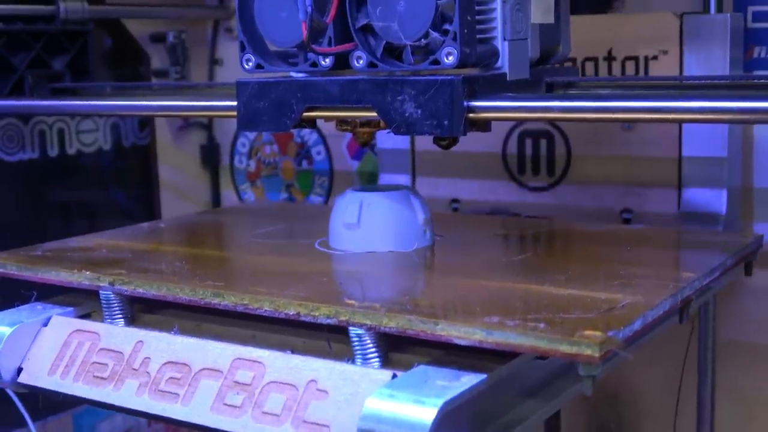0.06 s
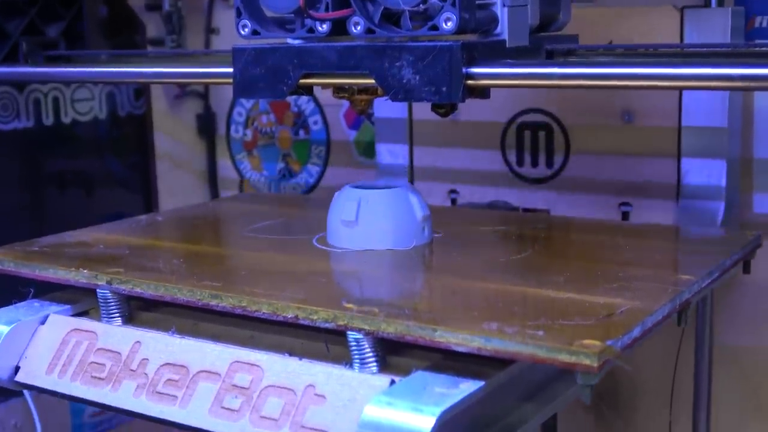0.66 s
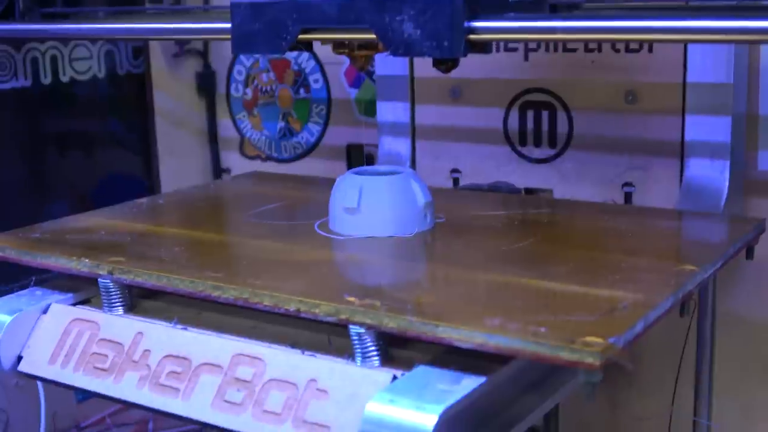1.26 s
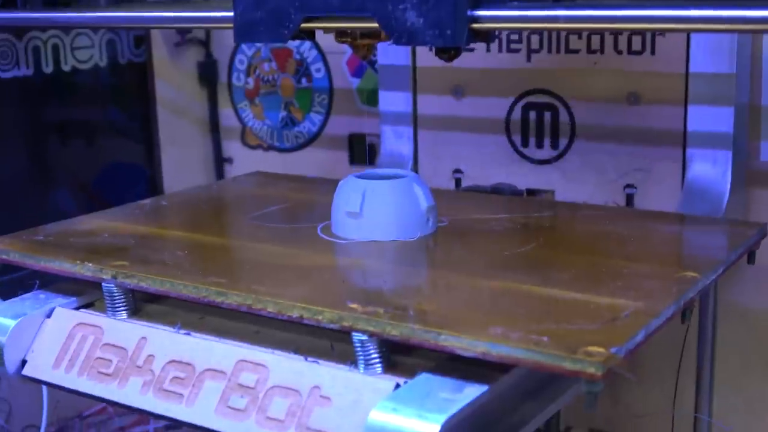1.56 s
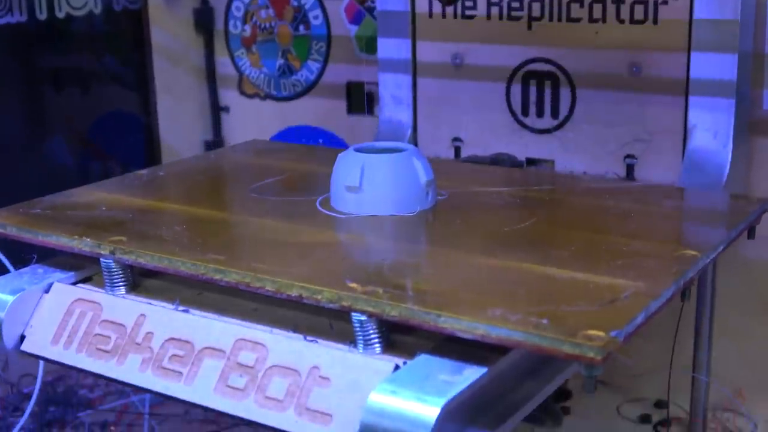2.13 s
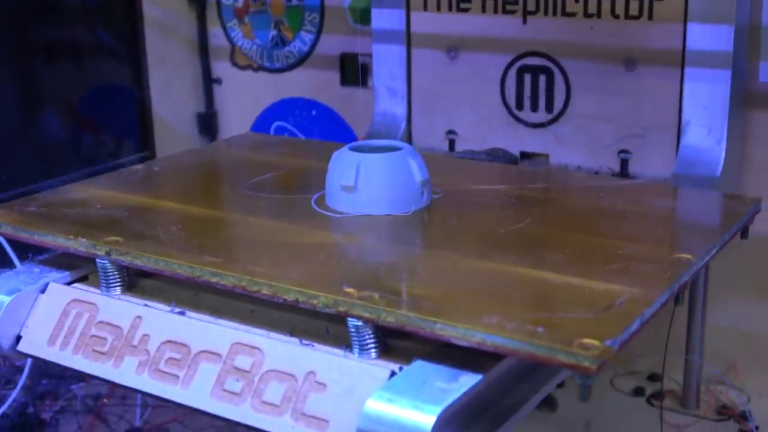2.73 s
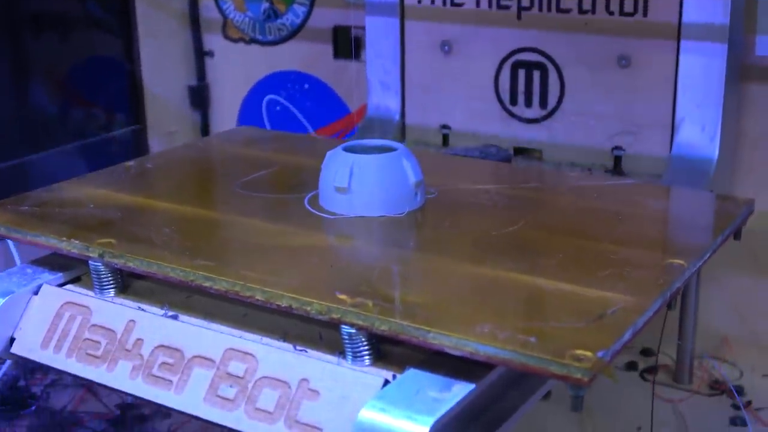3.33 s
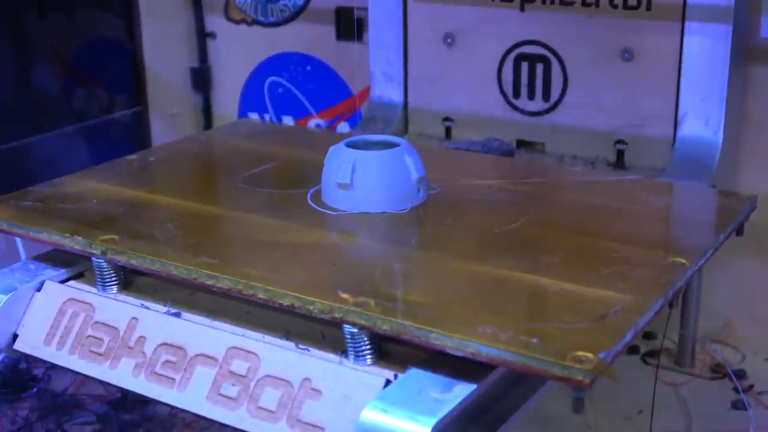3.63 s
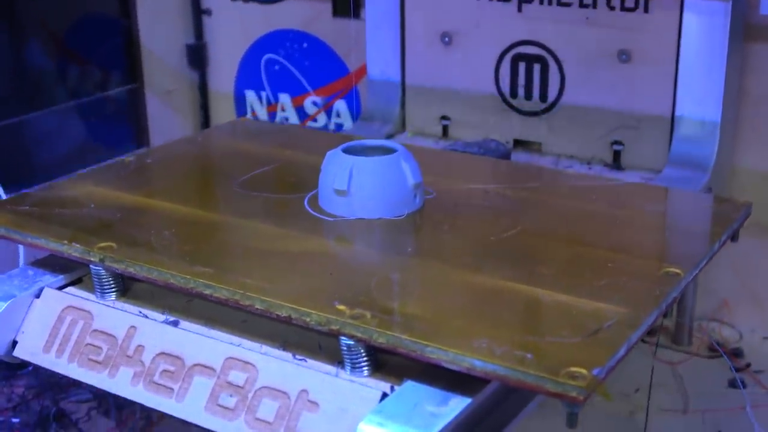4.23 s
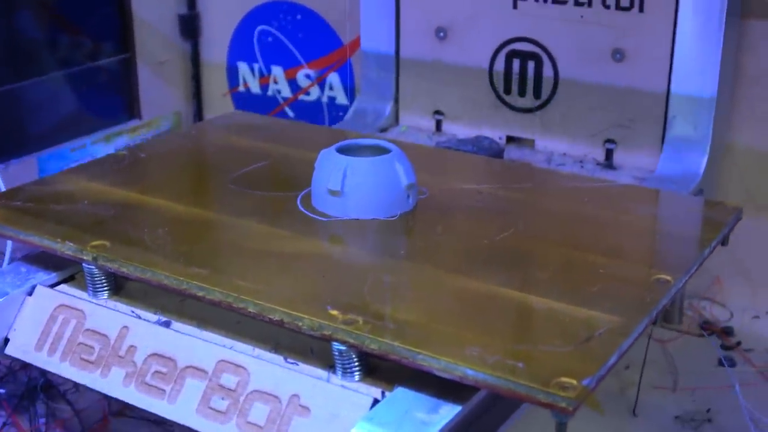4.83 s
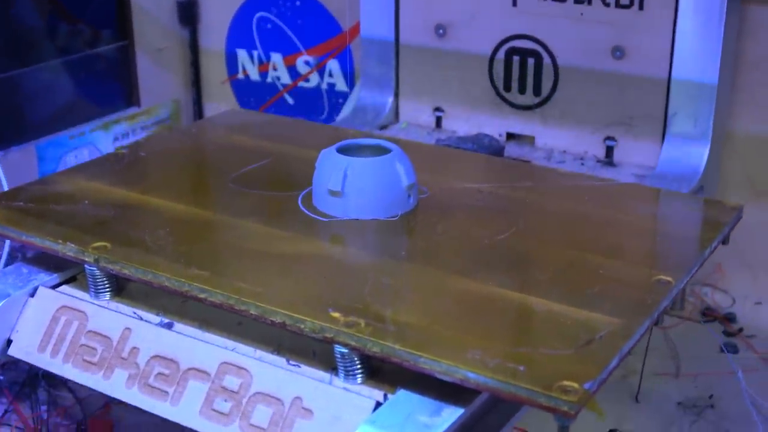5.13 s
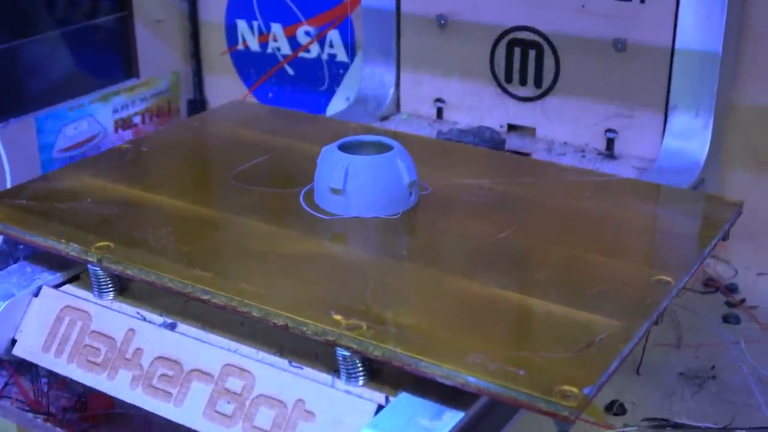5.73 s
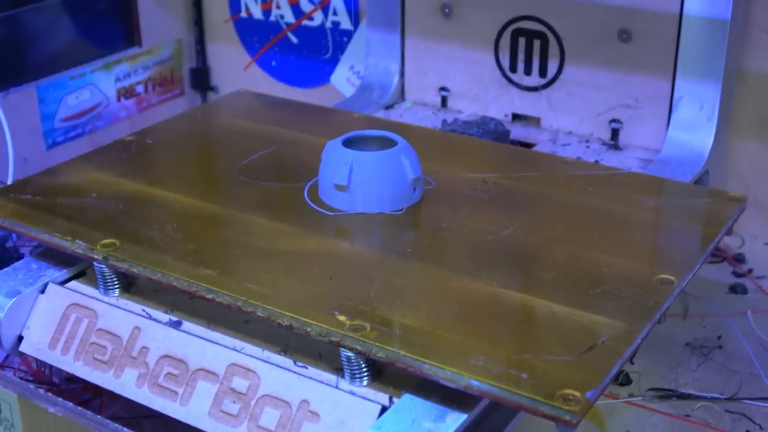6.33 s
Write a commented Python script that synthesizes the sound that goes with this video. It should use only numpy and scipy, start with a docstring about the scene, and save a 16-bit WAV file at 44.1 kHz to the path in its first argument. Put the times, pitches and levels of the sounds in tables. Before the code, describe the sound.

A small 3D printer is already running at the start, heard close up in a workshop, and continues without a break for a little over six seconds. The main sound is a mid-pitched motor whine that holds one pitch and throbs evenly about eight times a second, its overtones slowly swelling and fading. Underneath, small fans give a low hum, joined by a thin high buzz and a soft rush of air and bearings that grows slightly louder, then levels off. A light ringing from the carriage colours the first two seconds. At about 1.8 seconds there is a brief soft sizzle, and a faint high fluttering tone steps forward and stays. More gentle sizzling drifts in and out from around 3 seconds onward. Between about 5.6 and 6 seconds a second motor whirs faintly, gliding down and up in pitch, while the main whine carries on to the end.

```python
"""A steady, throbbing motor whine, close up: a 3D printer running at one speed in a workshop.
The stepper sings at its step rate and throbs once a shaft turn; its overtones swell and fade
as the microphone glides through their standing waves. Under it three small fans hum, air and
bearings rush through the frame and the motor coils add a thin buzz. The carriage wakes
sizzling resonances, and near the end a second axis whirs faintly."""
import sys
import numpy as np
from scipy import signal
from scipy.fft import rfft, irfft
from scipy.io import wavfile

SR = 44100
rng = np.random.default_rng(int(sys.argv[2]) if len(sys.argv) > 2 else 0)


def dump(signal):
    """Clip the signal to [-1, 1] and save it as 16-bit WAV at the path in sys.argv[1]."""
    limited = np.clip(np.atleast_2d(signal).T, -1, 1)
    pcm = np.round(limited * 32767).astype(np.int16)
    wavfile.write(sys.argv[1], SR, pcm)


N = 281358
TIME, BIN_HZ = np.arange(N) / SR, np.fft.rfftfreq(N, 1 / SR)
STEP_HZ, STEPS_PER_TURN = 416.0, 50
SHAFT_HZ = STEP_HZ / STEPS_PER_TURN
SHAFT_ANGLE = 2 * np.pi * SHAFT_HZ * (TIME - 0.0062)  # zero at a peak of the throb


# The lead whine, each partial riding its own standing wave:
# step_multiple, level_db, drift_db_per_s, roughness, swing_db, antinode_s, period_s
WHINE_PARTIALS = [(1, -24.5, 0, .03, 1.5, 4.47, 10), (3, -45, 0.57, 0.13, 2.5, 3.66, 5.4),
                  (4, -53, 0.5, 0.07, 6.5, 2.52, 5.5), (5, -46.5, -2.5, 0.22, 5.8, 3.97, 11),
                  (7, -67.5, 0, 0, 8, 1.8, 2.54), (9, -68, 1, 0.3, 4, 4.46, 6),
                  (15, -80, 0.5, .4, 9, 3.9, 4), (16, -72, 0, .45, 2, 5.47, 4.6)]
# Level envelopes of three overtones that come and go unevenly: time_s, level_db (before lift_db)
SECOND_ENVELOPE = [(0.1, -39), (0.6, -36), (1.64, -42), (1.98, -50), (4.28, -47), (6.07, -40), (6.13, -36),
                   (6.3, -43)]
SIXTH_ENVELOPE = [(0.1, -54), (0.43, -64), (1.26, -53), (2.33, -60), (2.85, -53), (3.91, -43.5),
                  (4.55, -50), (5.99, -50), (6.3, -52)]
EIGHTH_ENVELOPE = [(0.1, -52), (1.2, -61), (1.48, -51), (2.81, -60.5), (4.81, -67), (4.97, -57), (5.4, -68),
                   (5.71, -60), (6.3, -58)]

def stepper_whine():
    """Clocked steps give sharp overtones that swell and fade as the microphone moves."""
    steps, out = STEP_HZ * TIME, np.zeros(N)
    for multiple, db, drift_db_per_s, roughness, swing_db, antinode_s, period_s in WHINE_PARTIALS:
        ripple_db = 0.5 * wander(2.7) * (multiple > 1)
        level_db = db + drift_db_per_s * TIME + standing_wave(swing_db, antinode_s, period_s)
        out += tone(multiple * steps + rng.random(), level_db + ripple_db, roughness, flutter_hz=6.5)
    lift_db = 1.6
    for multiple, envelope in ((2, SECOND_ENVELOPE), (6, SIXTH_ENVELOPE), (8, EIGHTH_ENVELOPE)):
        level_db = lift_db + np.interp(TIME, *np.transpose(envelope))
        out += tone(multiple * steps + rng.random(), level_db, roughness=0.06, flutter_hz=8.9)
    return out


# The throb, with sidebands set relative to each tone:
# step_multiple, level_db, upper_sideband_db, lower_sideband_db, wobble_db, singing_gain_db
THROB_TONES = [(.5, -29.5, -2, -11, 0.33, -0.3), (1.5, -56, 0, -9, 3, -1), (2.5, -65, 9, 5, 1.5, -1.5),
               (5.5, -61.5, 0, -8, 1.4, 7)]

def rotor_throb():
    """The slightly off-centre rotor swells and bends the half-step tones once a turn."""
    turn, out = np.exp(1j * SHAFT_ANGLE), np.zeros(N)
    singing = np.clip((TIME - 1.83) / 0.069, 0, 1)  # the highest tone steps forward
    for multiple, db, upper_db, lower_db, wobble_db, singing_gain_db in THROB_TONES:
        carrier = np.exp(2j * np.pi * (multiple * STEP_HZ * TIME + rng.random()))
        beat = 1 + amp(upper_db) * turn + amp(lower_db) / turn
        level_db = db + singing_gain_db * singing + wobble_db * wander(1.3)
        out += np.sqrt(2) * amp(level_db) * (carrier * beat).real
    return out


# Low body under the whine: shaft_multiple, level_db, roughness
DRIVE_TONES = [(11.9, -68.5, 0.2), (38, -38.5, 0.1), (37.5, -49, 0.47), (62.44, -54.5, 0.35),
               (64.5, -64, .3), (27, -52, 0.34), (29.8, -54, 0.7), (32.56, -51, 0.37), (35.2, -57.5, 0)]

def drive_hum():
    """Motor, pulley and belt hum at higher multiples of the shaft rate."""
    turns = SHAFT_HZ * TIME
    return sum(tone(multiple * turns + rng.random(), db, roughness, flutter_hz=18)
               for multiple, db, roughness in DRIVE_TONES)


# One fan a row: pitch_hz, level_db (before trim_db), then its overtones relative to that level:
# second_db, third_db, fourth_db, fifth_db
FAN_VOICES = [(125.93, -38.5, -14, -18, -16, -36), (132.93, -48, -23, 3, -28, -11.5),
              (123.1, -60.5, -12, 9, 11.5, 10)]

def fan_hum(trim_db=-0.8):
    """Five-bladed fans at nearly equal speeds drift a little and beat with each other."""
    out = np.zeros(N)
    for pitch_hz, db, *overtones_db in FAN_VOICES:
        turns = np.cumsum(pitch_hz * (1 + 0.00069 * wander(1))) / SR
        for k, relative_db in enumerate([0] + overtones_db, 1):
            out += amp(db + relative_db) * np.sqrt(2) * np.cos(2 * np.pi * (k * turns + rng.random()))
    return out * amp(trim_db + standing_wave(swing_db=1.64, antinode_s=4.73, period_s=7.6))


# Base EQ curve of the rush: frequency_hz, density_db
RUSH_EQ = [(25, -104), (60, -89), (110, -77), (145, -79), (180, -72.5), (230, -70), (340, -72), (600, -68),
           (1150, -73), (2600, -77.5), (4800, -83.5), (6600, -85.5), (9000, -97.5), (12600, -96.5),
           (15700, -110)]
# Resonances of frame and bed, as bell boosts on that curve: centre_hz, width_hz, boost_db
FRAME_RESONANCES = [(219, 18, 7), (263, 23, 5.5), (395.5, 39, 8), (457, 68, 7), (940, 26, 3.5),
                    (1035, 39, 3.5), (1416, 195, 10.5), (1743, 90, 4), (2035, 71, 3.5), (2294, 23, 9),
                    (3890, 460, 4), (4550, 66, 0.5), (5260, 320, 4), (8300, 570, 3), (11840, 720, 0.5)]

def air_and_bearing_rush(swell_db):
    """Noise through the frame: lows pulse with the shaft, sizzle with the steps, under smooth hiss."""
    colour_db = eq_curve(RUSH_EQ)
    for centre_hz, width_hz, boost_db in FRAME_RESONANCES:
        colour_db += boost_db * 2 ** -(2 * (BIN_HZ - centre_hz) / width_hz) ** 2
    spectrum = rfft(rng.standard_normal(N)) * amp(colour_db) * np.sqrt(SR / 2)
    below_sizzle = 1 / (1 + (BIN_HZ / 1150) ** 6)
    below_hiss = 1 / (1 + (BIN_HZ / 7000) ** 12)
    bands = below_sizzle, below_hiss - below_sizzle, 1 - below_hiss
    low, sizzle, hiss = (irfft(spectrum * band, N) for band in bands)
    low *= (1 + 0.063 * np.cos(SHAFT_ANGLE)) * amp(0.15 * swell_db + 0.7 * wander(16))
    sizzle *= (1 + 0.081 * np.cos(2 * np.pi * STEP_HZ * TIME)) * amp(swell_db + 0.99 * wander(20))
    return low + sizzle + hiss * amp(swell_db)


# Patches of ringing, levels before flicker and pulsing:
# centre_hz, width_hz, level_db, peak_s, half_length_s, flicker_db, pulse_depth
CARRIAGE_RINGS = [(1454, 66, -50.5, 0.66, 1.6, -2, 1), (3450, 1300, -52, 1.85, 0.15, -3, 0),
                  (4000, 560, -56, 5.9, 0.51, 1, 0), (4554, 91, -54, 3.1, 1.7, 2, 0.1),
                  (5160, 200, -58, 5.1, 0.88, 5, 0), (5630, 600, -57.5, 4.2, 0.54, 4, 0)]

def carriage_rings(pulse_hz=8.9, pulse_peak_s=0.58):
    """Bearings on the rods excite sizzling resonances that fade in, flicker or pulse, and fade out."""
    out = np.zeros(N)
    pulse = np.cos(2 * np.pi * pulse_hz * (TIME - pulse_peak_s))
    for centre_hz, width_hz, db, peak_s, half_length_s, flicker_db, pulse_depth in CARRIAGE_RINGS:
        resonance = 1 / (1 + (2.3 * (BIN_HZ - centre_hz) / width_hz) ** 2)
        ring = irfft(rfft(rng.standard_normal(N)) * resonance, N)
        envelope = np.exp(-.5 * ((TIME - peak_s) / half_length_s) ** 2) * (1 + pulse_depth * pulse)
        out += ring / ring.std() * amp(db + flicker_db * wander(24)) * envelope
    return out


# Base contour of the buzz's comb lines: frequency_hz, level_db
BUZZ_EQ = [(6000, -78.5), (6500, -63), (7000, -94), (8300, -76), (9000, -76), (10200, -79.5), (10800, -87),
           (11700, -70.5), (12200, -80), (12700, -90), (13500, -87), (15700, -85)]

def coil_buzz(swell_db, blur_hz=9):
    """The coil current repeats every four steps: a bright comb of slightly blurred lines."""
    cycle_hz = STEP_HZ / 4
    line = np.round(BIN_HZ / cycle_hz).astype(int)
    comb = 1 / (1 + ((BIN_HZ - line * cycle_hz) / blur_hz) ** 2) ** 2 / (np.pi / 2 * blur_hz)
    scatter_db = 0.86 * rng.standard_normal(line.max() + 1)[line]
    line_db = eq_curve(BUZZ_EQ) + scatter_db - 2.8 * (line % 2)  # odd lines are weaker
    spectrum = rfft(rng.standard_normal(N)) * amp(line_db) * np.sqrt(comb * SR / 2)
    return irfft(spectrum, N) * amp(swell_db)


# Two faint glides, one down and one up: start_s, end_s, start_hz, end_hz, level_db
AXIS_GLIDES = [(5.624, 5.91, 635, 450, -49), (5.71, 6.023, 502, 612, -48)]

def second_axis_whirs():
    """A second axis briefly changes speed: rough, softly edged glides."""
    out = np.zeros(N)
    for start_s, end_s, start_hz, end_hz, db in AXIS_GLIDES:
        progress = np.clip((TIME - start_s) / (end_s - start_s), 0, 1)
        cycles = np.cumsum(start_hz + (end_hz - start_hz) * progress) / SR
        fade = abs(np.sin(np.pi * progress)) ** .7
        out += tone(cycles, db, roughness=0.52, flutter_hz=41) * fade
    return out


def standing_wave(swing_db, antinode_s, period_s):
    """Gain in dB at a microphone that glides evenly through a tone's nodes and antinodes."""
    return swing_db * np.cos(2 * np.pi * (TIME - antinode_s) / period_s)


def tone(cycles, db, roughness, flutter_hz):
    """A sine of rms level db, roughened by flutter in strength and phase."""
    angle = 2 * np.pi * cycles
    wave = (1 + roughness * wander(flutter_hz)) * np.cos(angle)
    wave += roughness * wander(flutter_hz) * np.sin(angle)
    return np.sqrt(2) * amp(db) * wave


def wander(rate_hz):
    """A smooth random modulator with an rms near 1, rolling off above rate_hz."""
    size, control_hz = 8192, 1000
    hz = np.fft.rfftfreq(size, 1 / control_hz)
    slow = irfft(rfft(rng.standard_normal(size)) / (1 + (hz / rate_hz) ** 2))
    return np.interp(TIME, np.arange(size) / control_hz, slow / slow.std())


def eq_curve(points):
    """Level in dB at every bin, joining the points on a log-frequency axis."""
    hz, db = np.transpose(points)
    return np.interp(np.log(BIN_HZ + 1), np.log(hz + 1), db)


def amp(db):
    """Decibels to gain."""
    return 10 ** (np.asarray(db) / 20)


def scene():
    """The whole printer in mono; rush and buzz grow louder, then level off."""
    start_db, settled_db, settle_s = -2.2, 0.7, 3.6
    swell_db = settled_db + (start_db - settled_db) * np.exp(-TIME / settle_s)
    motors = stepper_whine() + rotor_throb() + drive_hum() + second_axis_whirs() + coil_buzz(swell_db)
    return (motors + fan_hum() + air_and_bearing_rush(swell_db) + carriage_rings())[None]


def record(dry):
    """Short fades at both ends and a steep high cut."""
    fades = signal.windows.tukey(N, .002)
    high_cut = signal.firwin(1023, 15760, window=("kaiser", 9), fs=SR)
    return signal.oaconvolve(dry * fades, high_cut[None], "same")


dry = scene()
out = record(dry)
dump(out)
```